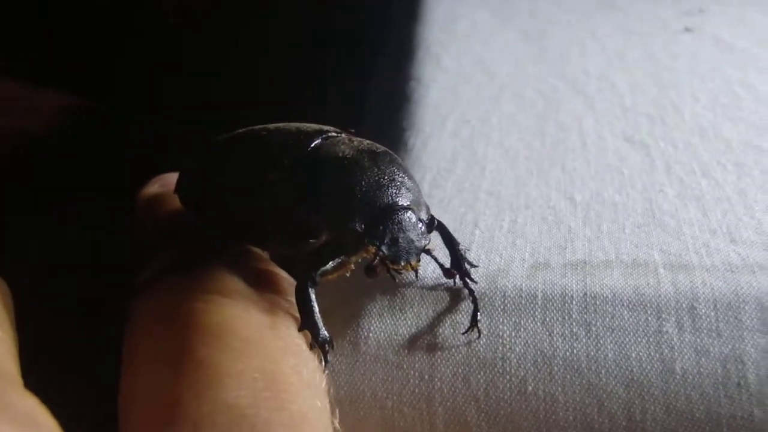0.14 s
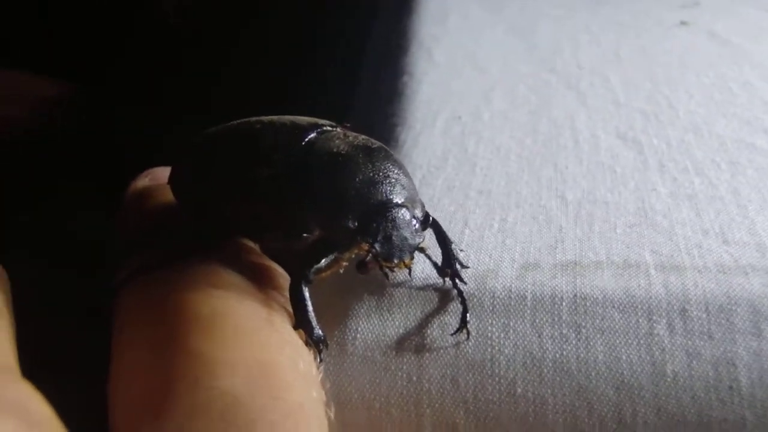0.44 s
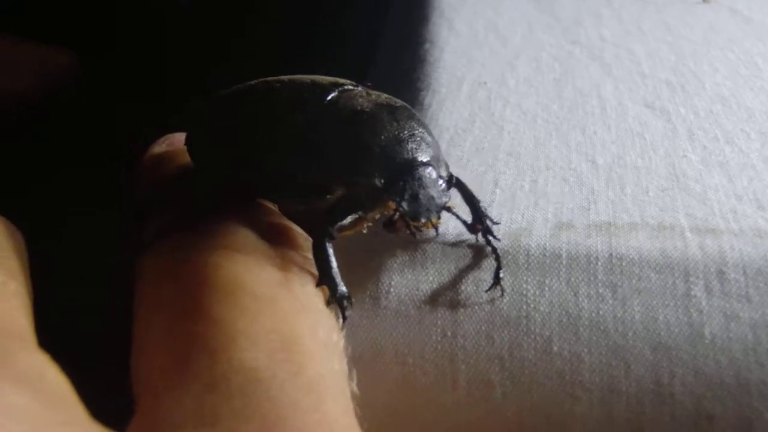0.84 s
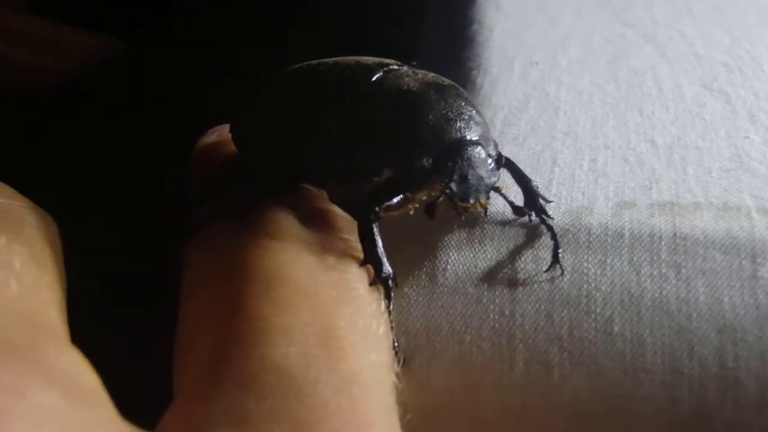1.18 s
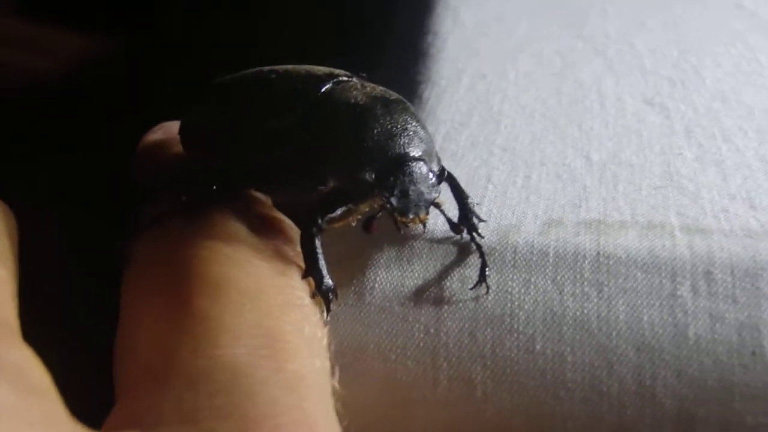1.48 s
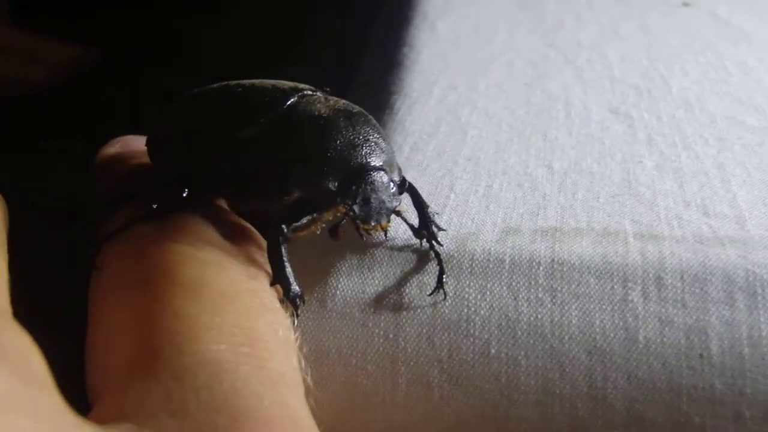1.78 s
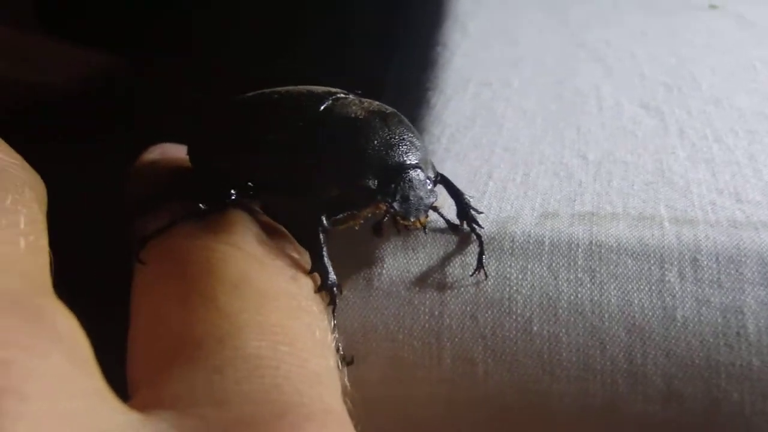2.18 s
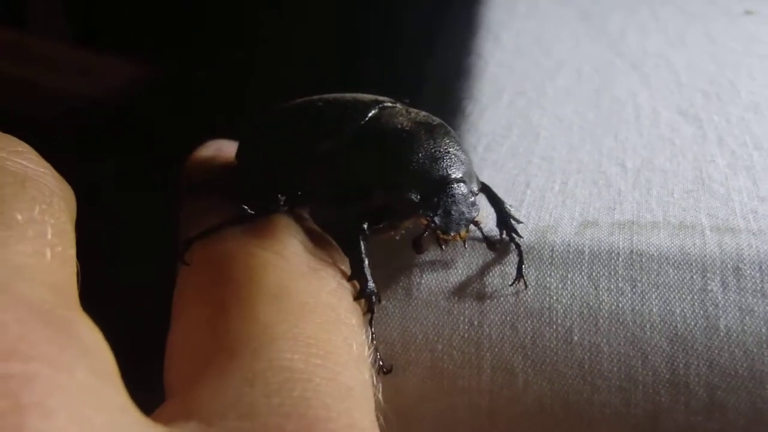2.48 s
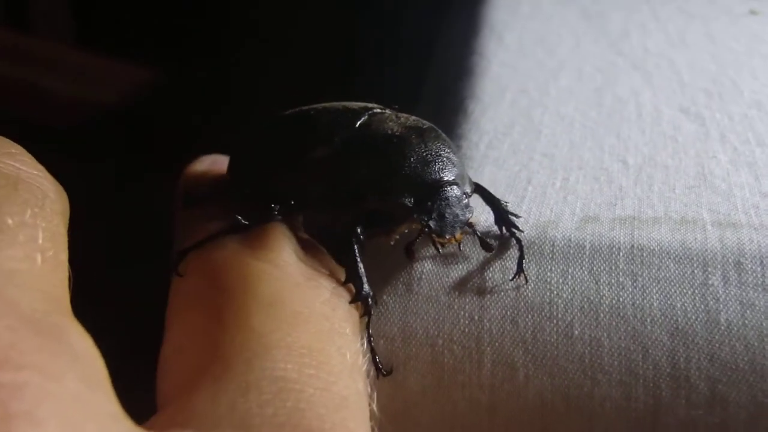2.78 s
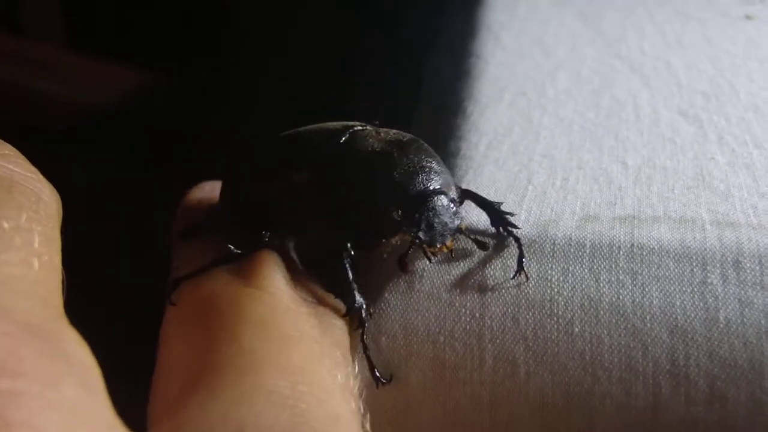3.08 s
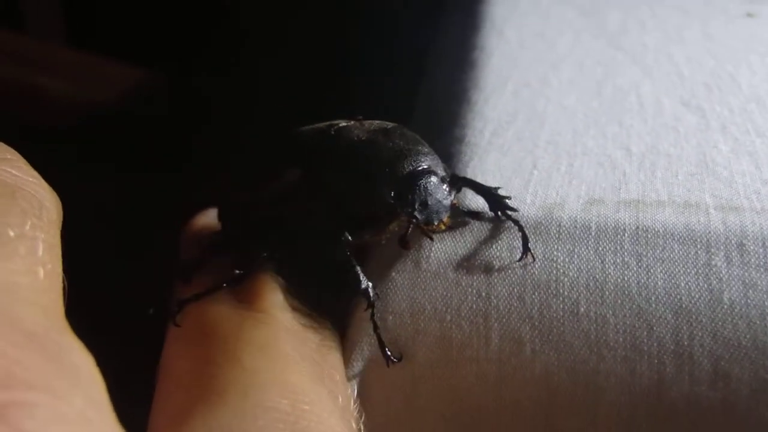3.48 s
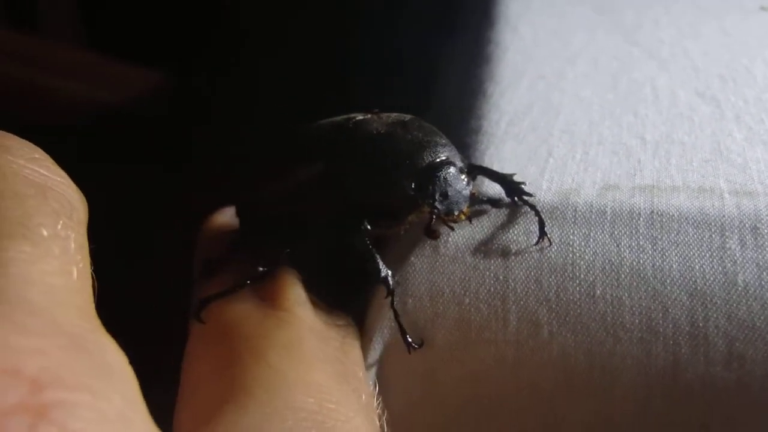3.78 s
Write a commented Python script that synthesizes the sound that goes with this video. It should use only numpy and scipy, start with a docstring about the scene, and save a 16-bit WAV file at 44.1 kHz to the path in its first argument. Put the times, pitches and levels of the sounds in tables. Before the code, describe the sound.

A beetle held in a hand squeaks once, a bright grating rasp nearer the left, midway through. Before it comes one sharp click; faint camera ticks, whine and hiss continue in a small quiet room.

```python
"""A quiet room: a large beetle on a hand, close to a camera, squeaks once by rubbing its abdomen on its wing cases.
The stroke starts as a soft rub, catches in single slips, runs into a fast rasp, stalls, speeds up and slides out.
Slips are impulses and the rub is dense random grains; both excite one short shell ring.
The camera's mechanism whines (wavering sines) and ticks faintly (ringing impulses) over steady hiss (shaped noise);
one sharp click, impulses with a noisy room tail, sounds in the room early on."""
import sys
import numpy as np
from scipy import signal
from scipy.fft import rfft, irfft
from scipy.io import wavfile
from scipy.ndimage import minimum_filter1d

SR = 44100
rng = np.random.default_rng(int(sys.argv[2]) if len(sys.argv) > 2 else 0)


def inscribe(sig):
    """Save sig as 16-bit PCM at rate SR to the path in sys.argv[1].

    A 1-D sig is mono; a 2-D sig holds one channel per row.
    Samples are clipped to [-1, 1] before scaling.
    """
    pcm = np.round(np.clip(np.atleast_2d(sig).T, -1, 1) * 32767)
    wavfile.write(sys.argv[1], SR, pcm.astype(np.int16))


N = 173754
T = np.arange(N) / SR  # [s]


def amp(db):
    """Decibels to gain."""
    return 10 ** (np.asarray(db) / 20)


def unit(x):
    """Scales to rms 1."""
    return x / np.sqrt(np.mean(x ** 2) + 1e-20)


def read(points, hz):
    """Reads a frequency table on a log-frequency axis."""
    f, value = np.transpose(points)
    return np.interp(np.log(hz + 1), np.log(f + 1), value)


def drift(hz):
    """Slow random wander of rms 1, up to about hz."""
    f = np.fft.rfftfreq(N, 1 / SR)
    spectrum = rfft(rng.standard_normal(N)) * np.exp(-(f / hz) ** 2)
    return unit(irfft(spectrum, N))


def impulses(rows):
    """One impulse for each (time [s], level [dB]) row."""
    s, db = np.transpose(rows)
    return np.bincount(np.round(s * SR).astype(int), amp(db), N)[:N]


def ring(points, size=2048):
    """Causal, minimum-phase impulse response with the given spectrum: energy comes as early as it can."""
    log_gain = np.log(amp(read(points, abs(np.fft.fftfreq(size, 1 / SR)))))
    spectrum = np.exp(np.conj(signal.hilbert(log_gain)))
    return np.fft.ifft(spectrum).real[:size // 2]


def through(x, response):
    """Convolves, channel by channel."""
    return signal.fftconvolve(np.atleast_2d(x), np.atleast_2d(response), axes=1)[:, :N]


def room(x):
    """Diffuse tail of a small room: noise that decays at each frequency's own rate, different at each microphone."""
    # how long the room rings: (frequency [Hz], time to fall 60 dB [s])
    room_decay = [(300, 0.19), (2000, 0.25), (6000, 0.29), (14000, 0.04)]
    noise = rng.standard_normal((2, SR // 2))
    hz, t, z = signal.stft(noise, SR, nperseg=256)
    fade = amp(-60 * t / read(room_decay, hz)[:, None])
    tail = signal.istft(z * fade, SR, nperseg=256)[1]
    return through(x, tail / np.linalg.norm(tail[0]))


def rattle(hits, t60):
    """A short burst of fine random contacts after each hit, with about the hit's energy."""
    onset_s = 0.00089  # it builds up just after the contact
    t = T[:SR // 10]
    swell = np.minimum(t / onset_s, 1) ** 2
    fade = swell * np.exp(-np.log(1000) * t / t60)
    return through(hits, fade / np.linalg.norm(fade))[0] * rng.standard_normal(N)


def knock(rows, colour, rattle_db, rattle_t60):
    """Small hard contacts and their rattle ring the object."""
    hits, body = impulses(rows), ring(colour)
    contacts = hits + amp(rattle_db) * rattle(hits, rattle_t60)
    return through(contacts, body / abs(body).max())


def hiss():
    """Steady noise, shared by the microphones in the bass and nearly independent in the treble."""
    # colour of the hiss: (frequency [Hz], relative level per Hz [dB])
    hiss_colour = [(20, -12), (50, -9.5), (100, 0), (170, 2.5), (280, 5), (420, 3), (650, 2), (1000, 0),
                   (1600, -1.5), (2400, -1.5), (3300, -2), (4300, -2.5), (5500, -4), (6500, -4), (8500, -5),
                   (12000, -3.5), (14800, -2), (16000, -16.5)]
    # stereo width: (frequency [Hz], left-right likeness [0-1])
    hiss_same = [(30, .1), (100, 0.68), (300, .7), (700, 0.47), (1500, 0.25), (3000, 0.086), (6000, 0.034),
                 (15000, .02)]
    # stereo balance: (frequency [Hz], left minus right [dB])
    hiss_balance = [(30, -10), (120, -1), (1000, -0.5), (3200, -.5), (4300, 3.5), (5500, 0), (15000, -0.2)]
    hz = np.fft.rfftfreq(N, 1 / SR)
    a, b = rfft(rng.standard_normal((2, N)))
    same = np.clip(read(hiss_same, hz), -1, 1)
    tilt = amp(read(hiss_balance, hz) / 2)
    left = a * tilt
    right = (same * a + np.sqrt(1 - same ** 2) * b) / tilt
    coloured = irfft(np.array([left, right]) * amp(read(hiss_colour, hz)), N)
    return amp(-49.5) * unit(coloured)


def whine():
    """The camera's steady tones: sines that waver slightly in pitch and level."""
    # tones of the whine: (frequency [Hz], rms level before the waver [dB])
    whine_tones = [(311.9, -72), (361.3, -68.5), (392.5, -67), (589.6, -53.5), (786, -77.5), (873, -75)]
    waver_hz, waver_db, wavers_per_s = 0.99, 0.95, 5.8  # rms pitch and level waver, its rough top speed
    out = np.zeros(N)
    for hz, db in whine_tones:
        turns = np.cumsum(hz + waver_hz * drift(wavers_per_s)) / SR
        level = np.sqrt(2) * amp(db + waver_db * drift(wavers_per_s))
        out += level * np.sin(2 * np.pi * turns)
    return out


def click():
    """One sharp click, stronger on the left: coloured impulses and their rattle, then the room's diffuse tail."""
    # a faint touch, the sharp main click, then a faint rebound: (time [s], level [dB])
    click_hits = [(.2137, -38), (.2141, -21), (.2169, -40)]
    # colour of the direct click: (frequency [Hz], relative level [dB])
    click_colour = [(200, -12), (500, -1), (760, 7), (1150, 6.5), (1600, -1), (2400, -5), (3600, -3),
                    (4400, -1), (5000, -12), (5900, -6), (6550, 10), (7300, -5), (9500, -8), (15000, -25)]
    # colour of its reflections: (frequency [Hz], relative level [dB])
    click_tail = [(200, -13), (750, 3.5), (1300, -4.5), (2300, 0.5), (3400, -4.5), (4400, -4), (5500, -9),
                  (6800, -5), (9000, -11), (14000, -21)]
    right_db, room_db = -3.5, 14
    direct = knock(click_hits, click_colour, rattle_db=-1.5, rattle_t60=0.0066)
    tail = room(through(impulses(click_hits), ring(click_tail)))
    return direct * amp([[0], [right_db]]) + amp(room_db) * tail


def ticks():
    """The mechanism ticks and rebounds once each time, ringing the camera housing, centred and dry."""
    # ticks, mostly on a beat of 7.5 a second: (time [s], level [dB])
    tick_hits = [(0.49, -42), (.5532, -43), (0.622, -42.5), (0.756, -39), (0.8889, -39), (1.0217, -35),
                 (1.1547, -37.5), (1.2885, -35), (1.4211, -35.5), (1.5553, -35), (1.6214, -36.5),
                 (1.6904, -37.5), (1.8216, -32), (2.0888, -36.5), (2.2216, -39), (2.3560, -35.5),
                 (2.4903, -35), (2.6234, -34), (3.4241, -34), (3.5576, -33), (3.6912, -37), (3.8253, -40)]
    # ring of the camera housing: (frequency [Hz], relative level [dB])
    housing = [(300, -40), (920, -20), (1130, 2.5), (1450, -1), (1720, 1), (2150, -11), (3100, -6),
               (4850, -9), (5350, -24), (12000, -30)]
    rebound_s, rebound_db = 0.00161, -14  # after and relative to the tick
    rebounds = [(s + rebound_s, db + rebound_db) for s, db in tick_hits]
    return knock(tick_hits + rebounds, housing, rattle_db=-8.5, rattle_t60=0.021)


def rubbing():
    """Dense tiny slips that follow the pressure of the stroke and of a few brief scrapes."""
    # smooth rubbing under and around the slips: (time [s], level [dB])
    rub_level = [(2.26, -66), (2.32, -51), (2.36, -47), (2.40, -56.5), (2.46, -51), (2.50, -43.5),
                 (2.56, -40.5), (2.70, -41.5), (2.81, -35), (2.87, -49), (2.93, -42.5), (2.99, -40.5),
                 (3.03, -41), (3.07, -39.5), (3.11, -45.5), (3.135, -50), (3.22, -59), (3.28, -68)]
    # brief faint scrapes as the beetle shifts: (time [s], length [s], level [dB])
    scrapes = [(0.185, .0025, -43), (0.26, 0.16, -52.5), (0.941, 0.019, -47), (1.094, 0.032, -50.5),
               (1.405, 0.0089, -47), (1.642, 0.031, -60), (3.213, .005, -53)]
    # how rubbing differs in colour from a slip, mostly duller: (frequency [Hz], relative level [dB])
    rub_tilt = [(1000, 1), (3000, 4), (3900, 1), (4250, 1), (5000, -6.5), (6500, -5.5), (10000, -7),
                (15000, -22)]
    grains_per_s, flutter_db, flutter_hz = 14000, 1.5, 70
    grains = (rng.random(N) < grains_per_s / SR) * rng.standard_normal(N)
    level = amp(np.interp(T, *np.transpose(rub_level), left=-120, right=-120))
    for s, length, db in scrapes:
        level = level + amp(db) * np.exp(-2 * ((T - s) / length) ** 2)
    flutter = amp(flutter_db * drift(flutter_hz))
    return through(unit(grains) * level * flutter, ring(rub_tilt))[0]


def slip_run(curve, jitter, spread_db):
    """A train of slips that follows the speed of the stroke, uneven in timing and strength."""
    s, rate, db = np.transpose(curve)
    t = np.arange(s[0], s[-1], 1 / SR)
    slip_count = np.floor(np.cumsum(np.interp(t, s, rate)) / SR)
    at = t[1:][np.diff(slip_count) > 0]
    shift, strength = rng.standard_normal((len(at), 2)).T
    times = at + jitter * shift / np.interp(at, s, rate)  # jitter is a share of the gap between slips
    levels = np.interp(at, s, db) + spread_db * strength
    return impulses(np.c_[times, levels])


def stroke():
    """Stick-slip friction: hard single slips, two fast runs of small ones, and the grit they crumble into."""
    # hard slips of the stroke: (time [s], level [dB])
    hard_slips = [(2.5360, -28), (2.5526, -25), (2.5674, -19.5), (2.5779, -19.5), (2.5859, -18),
                  (2.5943, -23), (2.6071, -17), (2.6182, -18), (2.6269, -17.5), (2.6344, -18),
                  (2.6420, -19), (2.6476, -15), (2.6541, -15), (2.6593, -19), (2.6653, -15.5),
                  (2.6731, -15.5), (2.6824, -14.5), (2.6893, -12), (2.6968, -18), (2.7059, -13.5),
                  (2.7153, -15), (2.7248, -15), (2.7317, -20), (2.7411, -14), (2.7505, -16.5),
                  (2.7590, -11.5), (2.7728, -15), (2.7871, -14.5), (2.8027, -17), (2.8179, -21),
                  (2.8362, -17.5), (2.8481, -16), (2.8620, -19.5), (2.8814, -17), (2.8977, -16.5),
                  (2.9070, -16), (2.9143, -17), (2.9202, -17.5), (2.9279, -18), (2.9354, -16),
                  (2.9417, -21), (2.9483, -18), (2.9528, -19)]
    # fast rasp of small slips: (time [s], rate [slips per s], level [dB])
    rasp = [(2.619, 570, -25.5), (2.645, 570, -25), (2.665, 530, -20), (2.70, 530, -20),
            (2.745, 540, -18.5), (2.775, 490, -21), (2.797, 560, -21.5), (2.806, 560, -24),
            (2.828, 460, -34)]
    # last run, as the stroke speeds up and slides out: (time [s], rate [slips per s], level [dB])
    run_out = [(2.953, 242.5, -24), (2.962, 350, -21), (2.972, 402, -22.5), (2.980, 459, -23.5),
               (2.988, 583, -31)]
    # how much the slips crumble into finer ones: (time [s], share [0-1])
    grit_share = [(2.60, .1), (2.65, 0.8), (2.79, 0.7), (2.83, 0.2), (2.94, 0.2), (2.97, 0.4)]
    recatch_s = .001  # no small slip comes this close to a hard one
    hard = impulses(hard_slips)
    free = minimum_filter1d((hard == 0) * 1., 2 * round(recatch_s * SR) + 1)
    small = slip_run(rasp, jitter=.15, spread_db=0.5) + slip_run(run_out, jitter=0.072, spread_db=2)
    slips = hard + free * small
    grit = amp(-5) * np.interp(T, *np.transpose(grit_share))
    # the division keeps the energy about the same
    return (slips + grit * rattle(slips, t60=0.0065)) / np.sqrt(1 + grit ** 2)


def beetle():
    """Slips and rubbing excite one short ring near 4.3 kHz, much stronger on the left, with a little room."""
    # ring of one slip at the near (left) microphone: (frequency [Hz], relative level [dB])
    shell_left = [(200, -40), (900, -31), (1700, -22.5), (2250, -18), (3100, -17.5), (3650, -10),
                  (4000, -3.5), (4230, 2.5), (4550, -0.5), (5000, -8), (5800, -20.5), (6450, -7.5),
                  (7100, -15.5), (8500, -18.5), (9800, -18), (12000, -30.5), (16000, -63)]
    # the same ring at the far (right) microphone: (frequency [Hz], relative level [dB])
    shell_right = [(200, -59), (900, -29.5), (1700, -23), (2300, -16), (3300, -14), (4650, -13.5),
                   (5200, -30), (5900, -34), (6500, -24), (7400, -30), (9000, -29), (12000, -37.5),
                   (16000, -37)]
    right_lag_s, room_db = .00005, -20
    far = np.roll(ring(shell_right), round(right_lag_s * SR))
    shell = np.array([ring(shell_left), far])
    # slips are scaled by the ring's peak, rubbing by its energy
    friction = stroke() / abs(shell[0]).max() + rubbing() / np.linalg.norm(shell[0])
    direct = through(friction, shell)
    return direct + amp(room_db) * room(direct)


def scene():
    """The beetle over the sounds of camera and room."""
    return hiss() + whine() + click() + ticks() + beetle()


def record(dry):
    """The recorder's band limit: a steep low-pass."""
    edge_hz = 15850
    low_pass = signal.firwin(511, edge_hz, window=("kaiser", 9), fs=SR)
    return signal.oaconvolve(dry, low_pass[None], "same")


dry = scene()
out = record(dry)
inscribe(out)
```